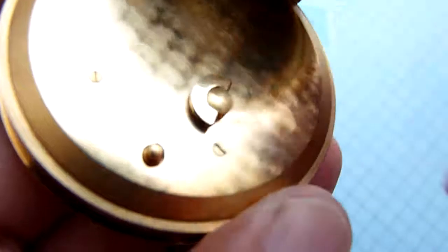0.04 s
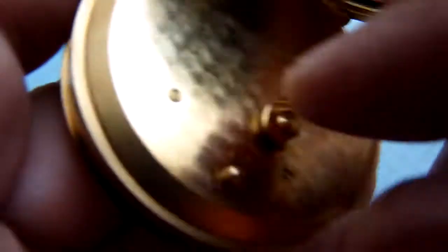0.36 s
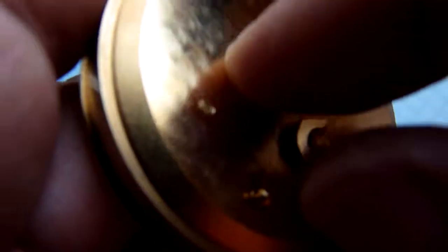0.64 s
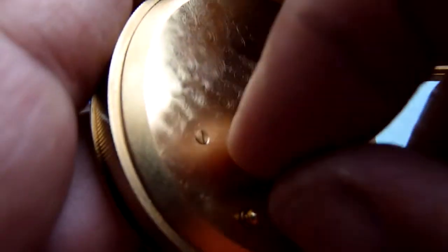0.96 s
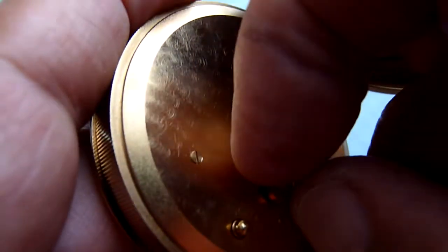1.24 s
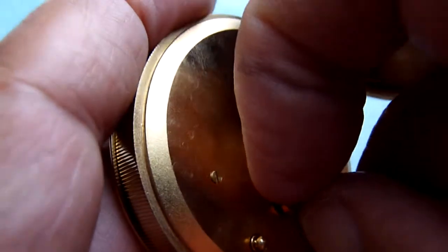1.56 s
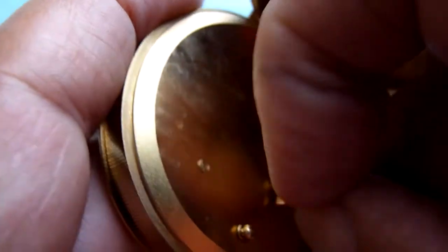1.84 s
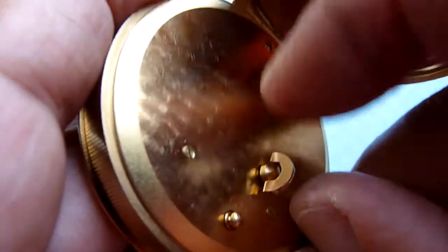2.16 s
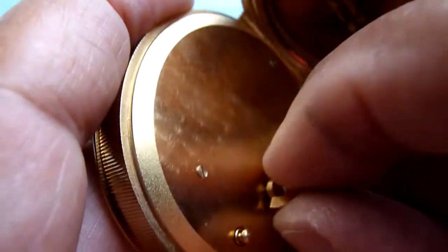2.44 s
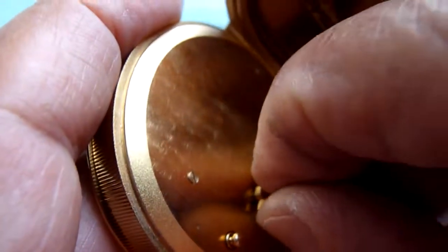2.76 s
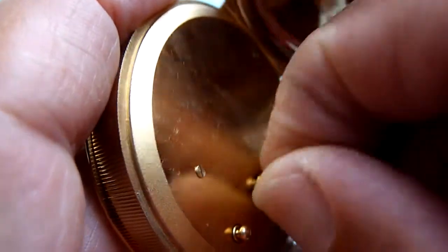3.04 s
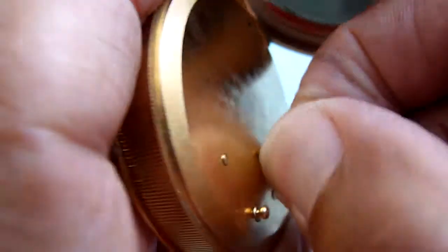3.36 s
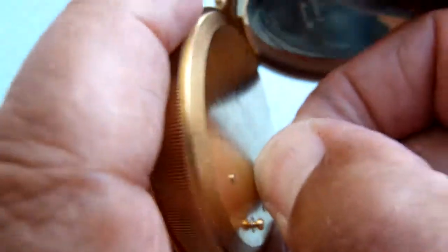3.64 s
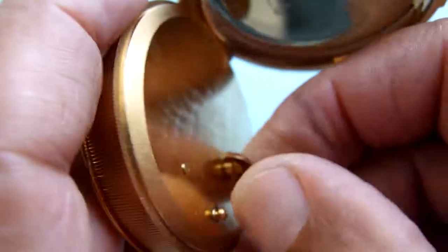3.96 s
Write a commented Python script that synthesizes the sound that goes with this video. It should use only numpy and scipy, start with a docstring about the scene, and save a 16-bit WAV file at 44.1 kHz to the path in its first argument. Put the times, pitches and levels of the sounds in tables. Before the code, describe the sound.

Sharp ratchet clicks of a pocket watch being wound with a small key, up close.

```python
"""An open pocket watch ticks faintly, eight times a second, over mains hum, room murmur and hiss.
Close by in the quiet room, a nail touches the metal, the lid pings and fingertips brush the case.
The small winding key knocks in its seat. As the fingers turn it, the pawl snaps over nine ratchet
teeth, rattling the wheels and ringing the case, and the key knocks again, harder."""
import sys
import numpy as np
from scipy import signal
from scipy.fft import rfft, irfft, next_fast_len
from scipy.io import wavfile
from scipy.ndimage import map_coordinates

SR = 44100
rng = np.random.default_rng(int(sys.argv[2]) if len(sys.argv) > 2 else 0)


def file_out(sig):
    """Save sig as 16-bit WAV at sys.argv[1]."""
    # one column per channel
    cols = np.atleast_2d(sig).T
    # limit, then scale
    lim = np.clip(cols, -1, 1)
    pcm = np.round(lim * 32767).astype(np.int16)
    wavfile.write(sys.argv[1], SR, pcm)


N = 176400
TIME_S = np.arange(N) / SR
SCATTER_DB = 2


def amp(db):
    """Decibels to gain."""
    return 10 ** (np.asarray(db) / 20)


def unit(x):
    """Scale to rms 1."""
    return x / np.sqrt(np.mean(x ** 2) + 1e-20)


def along(points, hz):
    """Interpolate (Hz, value) points on a log frequency axis."""
    f, v = np.transpose(points)
    return np.interp(np.log(hz + 1), np.log(f + 1), v)


def wobble(knots_per_s):
    """Smooth random curve, N samples long."""
    knots = rng.standard_normal(int(N * knots_per_s / SR) + 4)
    return map_coordinates(knots, [np.arange(N) * knots_per_s / SR])


def fade(t, t60):
    """Decay by 60 dB in t60 on either side of t = 0."""
    return np.exp(-np.log(1000) * np.abs(t) / t60)


def swell(centre_s, sigma_s):
    """Gaussian envelope of peak 1."""
    return np.exp(-.5 * ((TIME_S - centre_s) / sigma_s) ** 2)


def filtered(x, response):
    """Apply a gain given as a function of Hz."""
    n = x.shape[-1]
    m = next_fast_len(n + 8192)
    return irfft(rfft(x, m) * response(np.fft.rfftfreq(m, 1 / SR)), m)[..., :n]


def noise(colour, correlation, size=N):
    """Coloured stereo noise of rms 1 with the given left-right correlation."""
    def mid_side_gains(hz):
        angle = np.arccos(np.clip(along(correlation, hz), -1, 1)) / 2
        return amp(along(colour, hz)) * [np.cos(angle), np.sin(angle)]
    mid, side = filtered(rng.standard_normal((2, size)), mid_side_gains)
    return unit(np.array([mid + side, mid - side]))


def ring(modes, spread):
    """One blow on decaying modes; spread is each ear's phase scatter in radians at 10 kHz."""
    t = np.arange(SR // 4) / SR
    out = np.zeros((2, len(t)))
    for k, (hz, db, t60) in enumerate(modes):
        gain = amp(db + SCATTER_DB * rng.normal())
        phase = k * np.pi + spread * hz / 10000 * rng.normal(size=(2, 1))
        out += gain * fade(t, t60) * np.sin(2 * np.pi * hz * t + phase)
    return out


def pulse(colour, size=256):
    """One sharp contact: a coloured minimum-phase pulse of energy 1."""
    cepstrum = irfft(np.log(amp(along(colour, np.fft.rfftfreq(size, 1 / SR)))))
    cepstrum[1:size // 2] *= 2
    cepstrum[size // 2 + 1:] = 0
    x = irfft(np.exp(rfft(cepstrum)))
    return x / np.linalg.norm(x)


def add(out, s, x):
    """Mix x into out at s seconds."""
    i = round(s * SR)
    out[:, i:i + x.shape[1]] += x[:, :N - i]


# Each row: frequency in Hz, level in dB, unsteadiness as a ratio to the steady tone.
HUM_LINES = [(49.4, -52, 0.02), (98.6, -65, 0.33), (131.5, -62.5, 0.43), (177.4, -59.5, 1.4),
             (298.7, -55.5, .6), (398, -63.5, 1.14), (522, -69.5, 0.64), (1126, -72.5, 0.93)]
# Each row: centre in seconds, sigma in seconds, frequency in Hz, peak level in dB.
BRIEF_TONES = [(2.63, .02, 300, -46), (3.42, .13, 100, -50)]


def hum():
    """Low wavering hum tones; a brief 300 Hz blip and a soft 100 Hz swell."""
    out = np.zeros(N)
    for hz, db, unsteadiness in HUM_LINES:
        waver = 1 + unsteadiness * (wobble(14) + 1j * wobble(14))
        tone = np.exp(2j * np.pi * (hz * TIME_S + rng.random()))
        out += amp(db) * unit(np.real(waver * tone))
    for s, sigma_s, hz, db in BRIEF_TONES:
        out += amp(db) * swell(s, sigma_s) * np.sin(2 * np.pi * hz * TIME_S)
    return out


# Noise spectra. Each row: frequency in Hz, relative density in dB.
MURMUR_COLOUR = [(25, -8), (75, -2), (110, 1.5), (240, 1), (350, 3), (480, 0), (620, -4.5), (850, -3),
                 (1200, -8.5), (1600, -12.5), (2200, -22), (3500, -55), (8000, -89)]
HISS_COLOUR = [(500, 11.5), (2000, 7.5), (3500, 11), (5800, 9.5), (7500, 7), (10000, 5.5), (14500, 5.5),
               (15400, -4), (15900, -22)]
# Each row: frequency in Hz, left-right correlation.
MURMUR_CORRELATION = [(130, 0.98), (300, 1), (640, 0.97), (1400, 0.85), (3000, 0.18)]
MURMUR_DB, HISS_DB = -51.5, -64.5


def background():
    """Hum and low room murmur, slightly left, with uncorrelated microphone hiss."""
    low = hum() + amp(MURMUR_DB) * noise(MURMUR_COLOUR, MURMUR_CORRELATION)
    hiss = amp(HISS_DB) * noise(HISS_COLOUR, correlation=[(1000, 0)])
    return low * amp([[.2], [-.2]]) + hiss


# Each row: frequency in Hz, level in dB, T60 in seconds.
ESCAPEMENT_MODES = [(5600, -6, .02), (11400, 0, .024), (11600, -3, .015), (12000, -6, .015),
                    (14400, -6, .02), (14750, -7, .02)]
TICK_START_S, TICK_PERIOD_S = .0995, .125
TICK_DB, TICK_FADE_DB_PER_S, TICK_NEAREST_S = -59.5, 5.5, .5


def ticking():
    """The escapement ticks evenly, louder as it comes closer, then fainter under the hand."""
    out = np.zeros((2, N))
    for s in np.arange(TICK_START_S, N / SR, TICK_PERIOD_S):
        db = TICK_DB - TICK_FADE_DB_PER_S * abs(s - TICK_NEAREST_S)
        add(out, s, amp(db) * ring(ESCAPEMENT_MODES, spread=.86))
    return out


# Each row: peak time in seconds, level in dB, rise time constant in seconds.
TOUCHES = [(.394, -52.5, 0.0019), (2.99, -55.5, 0.0015), (3.0298, -46, 0.0003), (3.9795, -41.5, 0.0018)]
# Each row: centre in seconds, sigma in seconds, level in dB.
BRUSHES = [(1.0, 0.016, -60.5), (1.35, 0.08, -68), (2.277, .018, -63.5)]
# Each row: frequency in Hz, relative level in dB.
TOUCH_COLOUR = [(500, -6), (2000, 11), (3500, 4), (6500, 10), (9000, 5), (11500, 8), (15000, 12.5),
                (16500, -16)]
BRUSH_COLOUR = [(500, -21), (2000, 1.5), (3500, -1), (6000, 4), (8500, -6), (11500, -3), (15500, -20)]
# Noise from the watch. Each row: frequency in Hz, left-right correlation.
WATCH_CORRELATION = [(1500, 1), (4000, 0.25), (7000, 0.67), (11000, 0.17)]
TOUCH_T60_S, BRUSH_GRAIN_DB = .048, 3


def fingers():
    """Short scratches of nail and key, and soft, grainy brushes of skin on metal."""
    touch = np.zeros(N)
    for s, db, rise_s in TOUCHES:
        t = TIME_S - s
        touch += amp(db) * np.where(t < 0, np.exp(-np.abs(t) / rise_s), fade(t, TOUCH_T60_S))
    grain = unit(amp(BRUSH_GRAIN_DB * wobble(300)))
    brush = grain * sum(amp(db) * swell(s, sigma_s) for s, sigma_s, db in BRUSHES)
    scratches = touch * noise(TOUCH_COLOUR, WATCH_CORRELATION)
    return scratches + brush * noise(BRUSH_COLOUR, WATCH_CORRELATION)


# Each row: start in seconds, level in dB, favoured frequency in Hz.
PINGS = [(.394, -60, 6050), (2.99, -60, 7000), (3.011, -58, 7000), (3.031, -57, 5400)]
# Each row: frequency in Hz, level in dB, T60 in seconds.
LID_MODES = [(3805, 2, .1), (5502, -1, .06), (5945, -3, .14), (6271, -1, .11), (7000, 0, .04),
             (11410, 7, .06)]
PING_WIDTH_HZ, PING_OTHERS_DB = 450, -11


def lid():
    """A nail or the key pings the open lid; the place of contact picks the modes that ring most."""
    out = np.zeros((2, N))
    for s, db, favoured_hz in PINGS:
        modes = []
        for hz, mode_db, t60 in LID_MODES:
            detuning = min(abs(hz - favoured_hz) / PING_WIDTH_HZ, 1)
            modes.append((hz, mode_db + PING_OTHERS_DB * detuning ** 2, t60))
        add(out, s, amp(db) * ring(modes, spread=.67))
    return out


# Each row: start in seconds, level in dB, gain of the upper modes in dB.
KNOCKS = [(2.051, -46, -16), (2.056, -44, -15), (2.0711, -37.5, -10), (3.5637, -28.5, -1.5)]
# Key and arbor. Each row: frequency in Hz, level in dB, T60 in seconds.
KEY_MODES = [(1240, 4, 0.022), (1370, 4, 0.016), (1690, -8, 0.035), (1930, -3, 0.022), (2236, 0, 0.013)]
# Hard edge of a knock. Each row: frequency in Hz, relative level in dB.
EDGE_COLOUR = [(400, -5), (1300, 3.5), (4200, -4.5), (7000, -17), (10000, -6), (12000, -33)]
EDGE_DB = 7


def key():
    """The key knocks dully against its seat; harder knocks are brighter."""
    out = np.zeros((2, N))
    for s, db, upper_db in KNOCKS:
        tilt = [(1250, 0), (1900, upper_db)]
        modes = [(hz, mode_db + along(tilt, hz), t60) for hz, mode_db, t60 in KEY_MODES]
        add(out, s, amp(db) * ring(modes, spread=.79))
        add(out, s, amp(db + EDGE_DB) * pulse(EDGE_COLOUR)[None])
    return out


# Each row: frequency in Hz, relative level in dB.
SNAP_COLOUR = [(300, -28), (900, -3), (1300, -6), (1650, -17), (2250, 0), (3000, -9), (4200, -5),
               (5000, -4), (5700, 1), (7000, -1), (8800, -1), (9500, -2), (10600, 2), (11400, 4),
               (12500, 3), (14400, 11), (15300, 0), (16000, -22)]
# Strike and two rebounds. Each row: mean delay in seconds, level in dB.
PAWL_CONTACTS = [(0, 15.5), (.0007, 11.5), (.0035, 9.5)]
DELAY_SCATTER, MAX_EAR_LAG_SAMPLES = .15, 2
CRACK_T60_S, RATTLE_T60_S, RATTLE_DB = .009, .056, -8
RATTLE_GRAIN_DB, RATTLE_GRAINS_PER_S = 3, 1000
SETTLE_HITS, SETTLE_SPAN_S, SETTLE_DB, SETTLE_T60_S = 8, (.005, .045), 3, .11


def pawl_snap(lead_samples):
    """The pawl cracks down and rebounds; the wheels rattle and settle in tiny hits."""
    t = np.arange(-lead_samples, SR // 4) / SR
    grain_db = RATTLE_GRAIN_DB * wobble(RATTLE_GRAINS_PER_S)[:len(t)]
    rattle = amp(RATTLE_DB + grain_db) * fade(t, RATTLE_T60_S)
    envelope = (t >= 0) * np.hypot(fade(t, CRACK_T60_S), rattle)
    snap = envelope * noise(SNAP_COLOUR, WATCH_CORRELATION, size=len(t))
    hits = [(delay * (1 + DELAY_SCATTER * rng.normal()), amp(db)) for delay, db in PAWL_CONTACTS]
    for delay in rng.uniform(*SETTLE_SPAN_S, size=SETTLE_HITS):
        hits.append((delay, amp(SETTLE_DB + SCATTER_DB * rng.normal()) * fade(delay, SETTLE_T60_S)))
    contact = pulse(SNAP_COLOUR, size=512)
    for delay, gain in hits:
        lags = rng.integers(MAX_EAR_LAG_SAMPLES + 1, size=2)
        ears = np.array([np.roll(contact, lag) for lag in lags])
        add(snap, lead_samples / SR + delay, gain * ears)
    return snap


# Each row: start in seconds, then in dB: level, low, middle, top, left minus right, case ring.
SNAPS = [(3.1470, -10.5, 0.5, -1.5, -3, -4, -5.5), (3.2294, -13.5, 1, -4, -2.5, -2, -5),
         (3.3156, -18, 6, -2, -4, -5, -3), (3.4134, -9.5, -1.5, -9.5, -4, -4, 1.5),
         (3.4759, -19, 7, -3.5, -4, -2, 2.5), (3.565, -21, 8, 2, -6, -2, -2),
         (3.6188, -13, -0.5, 3.5, -12, -3, -1), (3.6761, -13.5, 2.5, 2.5, -9, -2, -1.5),
         (3.7605, -9.5, -1.5, -5.5, -10, -4, -7)]
# Long-ringing case, damped movement plate. Each row: frequency in Hz, level in dB, T60 in seconds.
CASE_MODES = [(5580, -30, .13), (5949, -37, .16), (6330, -33, .13), (6965, -27, .2), (7600, -30, .06),
              (8511, -23, .11), (8665, -28, .1), (9405, -26, .06), (9760, -30, .11), (10400, -26, .12),
              (11200, -17, .05), (11364, -23, .11), (11540, -23, .14), (12030, -28, .11), (13125, -18, .06),
              (14461, -15, .06)]
PLATE_MODES = [(1330, -21.5, 0.015), (1880, -17, 0.011), (2290, -21.5, 0.012), (4270, -12, 0.012),
               (5520, -16.5, 0.033), (6920, -16, 0.051), (7680, -13, 0.044), (9840, -9, 0.034),
               (11600, -12.5, 0.041), (11570, 4, 0.002), (12770, -2.5, 0.014), (14200, -8, 0.014)]
# Each row: frequency in Hz, share of the left-right level difference.
PAN_SHARE = [(5000, 0.091), (11500, 0.16), (13000, 0.71)]
SNAP_DB, CASE_DB, PLATE_DB = -11, -9.5, -12


def ratchet():
    """At each tooth the pawl snaps and rings case and plate, with its own tone and pan."""
    out = np.zeros((2, N))
    lead_samples = SR // 100
    for s, db, low_db, middle_db, top_db, pan_db, ring_db in SNAPS:
        snap = amp(SNAP_DB) * pawl_snap(lead_samples)
        snap[:, lead_samples:] += amp(CASE_DB + ring_db) * ring(CASE_MODES, spread=2.0)
        snap[:, lead_samples:] += amp(PLATE_DB) * ring(PLATE_MODES, spread=.94)
        tone = [(2300, low_db), (5500, middle_db), (7500, middle_db),
                (10000, 0), (12000, 0), (13500, top_db)]

        def response(hz):
            ears_db = np.outer([.5, -.5], pan_db * along(PAN_SHARE, hz))
            return amp(db + along(tone, hz) + ears_db)
        add(out, s - lead_samples / SR, filtered(snap, response))
    return out


# Each row: frequency in Hz, T60 in seconds.
ROOM_DECAY = [(1000, .3), (6000, 0.44), (11500, 0.19), (14000, 0.12)]
ROOM_DB = -13.5


def room(x):
    """Small-room reverberation, 5 ms late; the high treble dies first."""
    hz, t, spectra = signal.stft(rng.standard_normal((2, SR // 2)), SR, nperseg=256)
    decay = fade(t, along(ROOM_DECAY, hz)[:, None])
    tail = signal.istft(spectra * decay, SR, nperseg=256)[1]
    delayed = np.pad(x, ((0, 0), (SR // 200, 0)))
    return signal.fftconvolve(delayed, tail / np.linalg.norm(tail[0]), axes=1)[:, :N]


def scene():
    """The watch close by, in its room."""
    watch = ratchet() + key() + lid() + fingers() + ticking()
    return watch + amp(ROOM_DB) * room(watch) + background()


# Each row: centre in Hz, width in Hz.
MIC_NOTCHES = [(2610, 286), (4610, 700), (7920, 230)]
BAND_LIMIT_HZ = 16400


def record(dry):
    """The microphone cuts three narrow notches and falls off steeply at its band limit."""
    def response(f):
        notches = [(hz ** 2 - f ** 2) / (hz ** 2 - f ** 2 + 1j * f * width) for hz, width in MIC_NOTCHES]
        low_pass = 1 / (1 + (f / BAND_LIMIT_HZ) ** 150)
        return np.prod(notches, axis=0) * low_pass
    return filtered(dry, response)


dry = scene()
out = record(dry)
file_out(out)
```